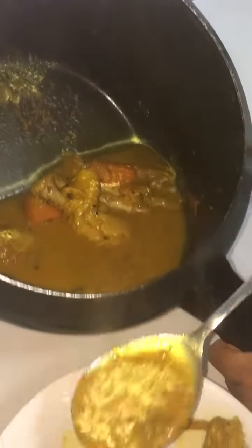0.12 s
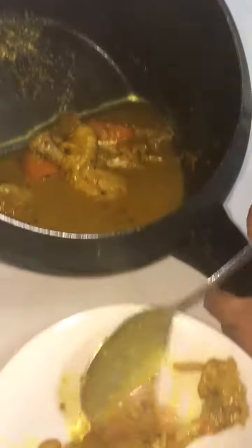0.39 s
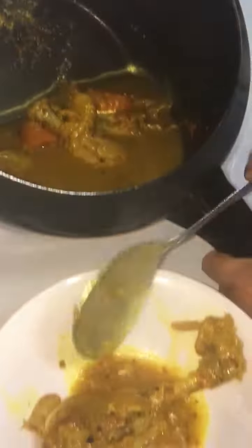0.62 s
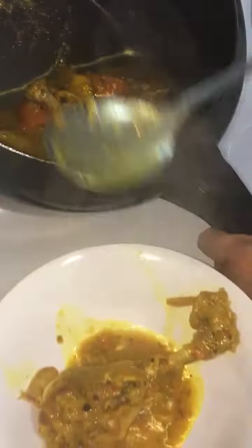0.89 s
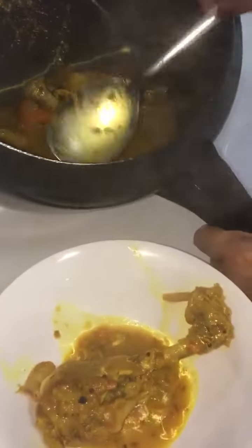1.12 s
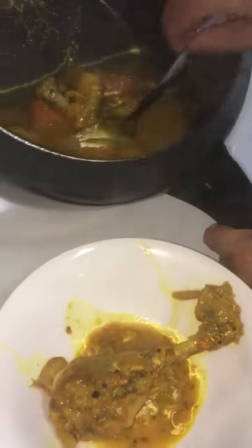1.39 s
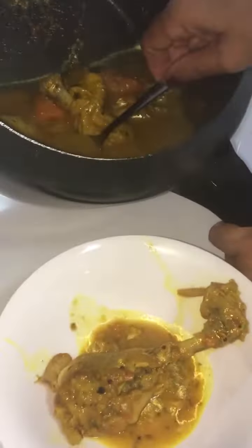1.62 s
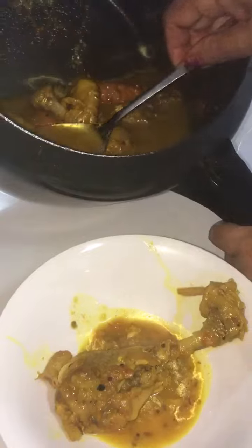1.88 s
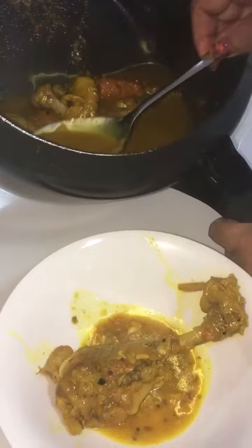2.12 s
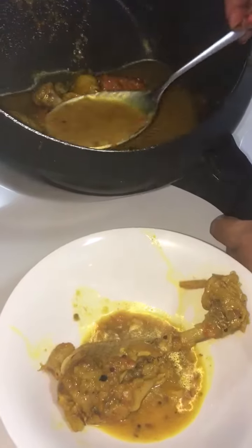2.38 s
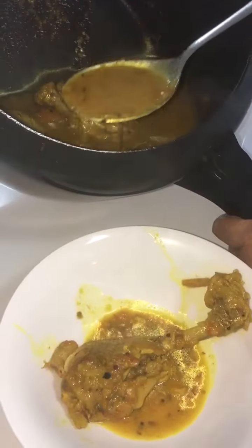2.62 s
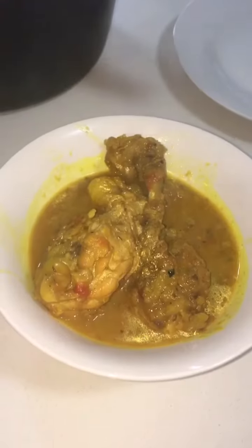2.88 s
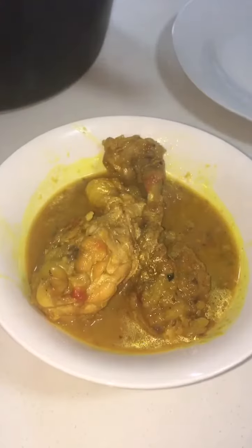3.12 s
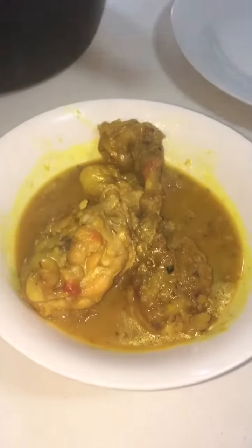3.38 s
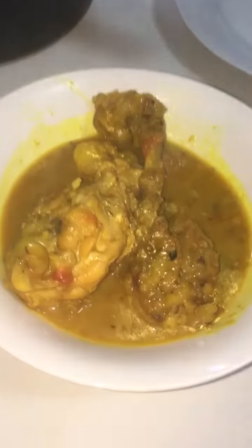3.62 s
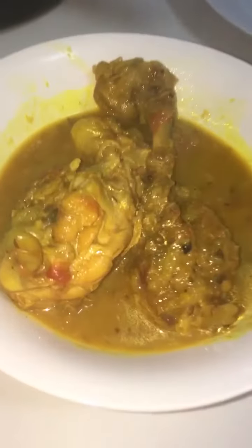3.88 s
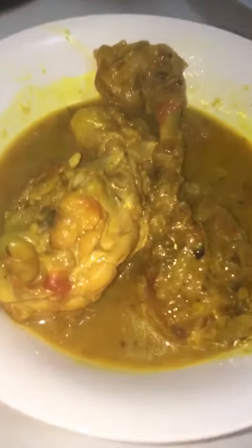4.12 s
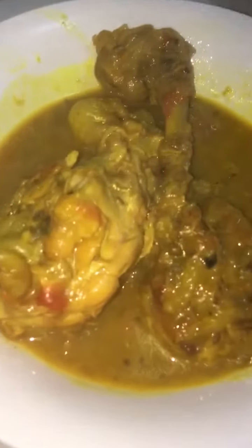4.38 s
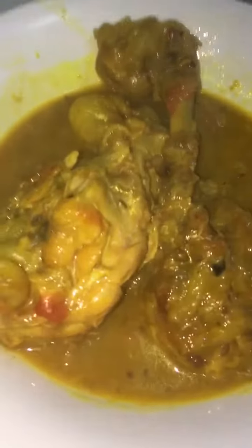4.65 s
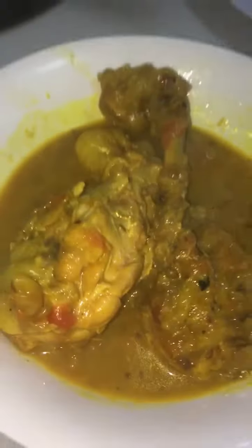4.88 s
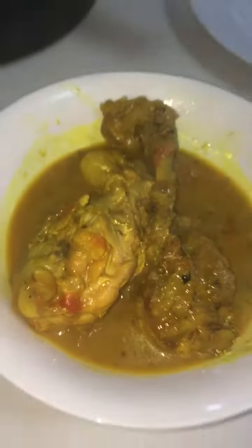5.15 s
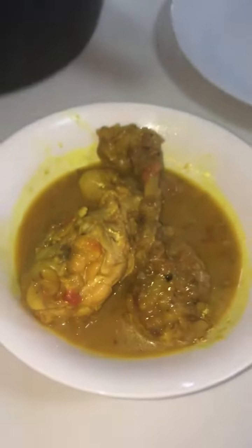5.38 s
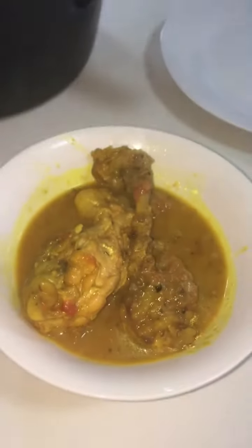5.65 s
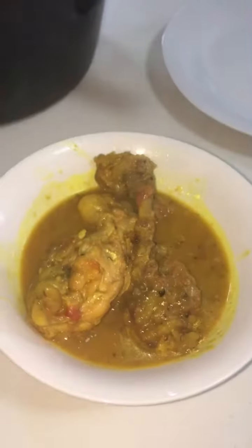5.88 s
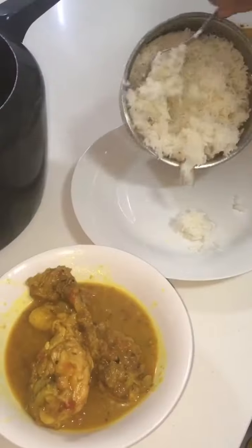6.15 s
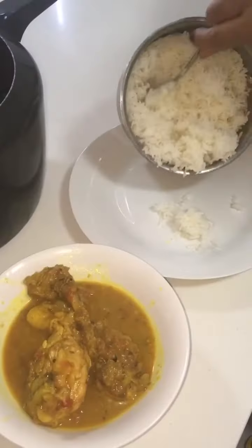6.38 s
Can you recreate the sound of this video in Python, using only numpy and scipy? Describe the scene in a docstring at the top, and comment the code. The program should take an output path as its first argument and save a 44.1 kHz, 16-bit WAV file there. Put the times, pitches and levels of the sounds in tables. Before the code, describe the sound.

A metal spoon knocks and scrapes inside a cooking pot in a humming kitchen, then cutlery clanks loudly, a dish drags and rice patters on a plate.

```python
"""A hard-walled home kitchen hums (filtered noise) under spells of rustling movement (shaped noise); a fan
squeaks once a turn (gliding tones), and drips and wet ticks snap and ring (noise bursts, damped sines).
A serving spoon strikes the inside of a cooking pot (modes set off by clicks), then scrapes it (stick-slip grains).
Knocks and bright clatters (noise bursts, wooden modes) and clanks of steel cutlery (modes, broad crash) lie further off.
Near the end a dish is dragged (boom and rasp), and rice patters on a plate (noise snaps, the louder grains ringing)."""
import sys
import numpy as np
from scipy import signal
from scipy.fft import rfft, irfft, next_fast_len
from scipy.io import wavfile
from scipy.ndimage import uniform_filter1d

SR = 44100
rng = np.random.default_rng(int(sys.argv[2]) if len(sys.argv) > 2 else 0)


def int16_out(signal):
    """Quantize to a 16-bit WAV file."""
    q = np.round(np.clip(np.atleast_2d(signal).T, -1, 1) * 32767)
    wavfile.write(sys.argv[1], SR, q.astype(np.int16))


def voltage_ratio(decibels):
    """Convert decibels (scalar or array-like) to amplitude ratios, 20 dB per decade."""
    exponent = np.asarray(decibels, float) / 20
    return 10 ** exponent


N = 287267

# modes of the pot with the spoon against it: f/Hz, free t60/s, relative level/dB struck, relative level/dB rubbed
POT_MODES = [(511, 0.3, -28.5, -24), (930, 0.39, -34, -15.5), (1018, 0.07, -12, -4.5),
             (1543, 0.17, -10, -12), (1920, 0.12, -25.5, -21), (2280, 0.091, -14.5, -55),
             (2449, .09, -14, -5), (2505, .095, 2.5, -3), (2527, .17, -3.5, -4), (2575, .06, -15, -1),
             (2580, 0.053, -36, -38), (2820, 0.27, -10.5, -11), (3064, 0.21, -19.5, -10.5),
             (3080, 0.096, -10.5, -26), (3450, 0.095, -6, -42), (3510, 0.045, -2.5, -11.5),
             (3610, 0.086, -20, -3), (3976, 0.079, -5.5, -3), (4060, 0.035, -13, -10),
             (4530, 0.0484, -6, -6), (4580, 0.051, -10, -48), (4980, 0.048, -39, -16),
             (5720, 0.089, -22, -11.5), (6390, 0.03, -47, -12.5), (6860, 0.041, -17.5, -18),
             (8450, .02, -31, -34), (8450, .02, -27, -21)]


def rms_one(x):
    """Normalisation: scale to unit rms."""
    return x / np.sqrt(np.mean(x ** 2) + 1e-20)


def level(rows, column):
    """Envelope: gain along straight lines in dB between the rows, silent outside them."""
    rows, out = np.array(rows), np.zeros(N)
    first, last = max(round(rows[0, 0] * SR), 0), min(round(rows[-1, 0] * SR), N)
    span = np.arange(first, last)
    out[span] = voltage_ratio(np.interp(span / SR, rows[:, 0], rows[:, column]))
    return out


def coloured(spectrum):
    """Spectral shaping: white noise weighted by a dB curve over log frequency, rms 1."""
    hz, db = np.transpose(spectrum)
    size = next_fast_len(N)
    log_hz = np.log(np.maximum(np.fft.rfftfreq(size, 1 / SR), 1))
    weight = voltage_ratio(np.interp(log_hz, np.log(hz), db))
    noise = irfft(rfft(rng.standard_normal(size)) * weight, size)
    return rms_one(noise[:N])


def band(x, low_hz, high_hz):
    """Band-pass filtering between two edges."""
    edges = [low_hz, min(high_hz, .45 * SR)]
    return signal.sosfilt(signal.butter(2, edges, "band", fs=SR, output="sos"), x)


def drift(rate):
    """Random modulation: normal values of spread 1, drawn rate times a second and joined by lines."""
    steps = rng.standard_normal(int(N * rate / SR) + 2)
    return np.interp(np.arange(N) * rate / SR, np.arange(len(steps)), steps)


def ring(x, hz, t60):
    """Damped resonator: a unit click sets off a decaying sine of height 1."""
    r, w = voltage_ratio(-60 / (max(t60, .001) * SR)), 2 * np.pi * hz / SR
    driven, out = np.flatnonzero(x), np.zeros(len(x))
    # computed from the first drive until the ring has died away
    part = slice(driven[0], driven[-1] + int(2 * t60 * SR))
    out[part] = signal.lfilter([0, np.sin(w)], [1, -2 * r * np.cos(w), r * r], x[part] + 1e-18)
    return out


def place(out, s, sound):
    """Superposition: a copy of out with a short sound added at time s."""
    i, out = round(s * SR), out.copy()
    out[i:i + len(sound)] += sound[:N - i]
    return out


def burst(t60, length=.05):
    """Exponential decay: white noise that dies away."""
    t = np.arange(round(length * SR)) / SR
    return rng.standard_normal(len(t)) * voltage_ratio(-60 * t / t60)


def room_tone():
    """Stationary noise: a coloured floor, and noise through narrow resonators that hums."""
    # spectrum of the floor: f/Hz, relative level per Hz/dB
    floor_spectrum = [(25, -27), (45, -7), (75, -13), (110, -4.5), (150, -5), (200, -4), (310, -13.5),
                      (600, -17.5), (1200, -20.5), (2600, -23), (4200, -34), (5000, -40), (6200, -35.5),
                      (7500, -46), (12000, -42.5), (16000, -45)]
    # hums: f/Hz, nominal width/Hz, rms level/dB
    hum_bands = [(97, 6.4, -58), (197.2, 21, -59), (778, 32, -69), (584.6, 8.7, -66.5), (1389, 17, -71)]
    tone = voltage_ratio(-50.5 + 2.4 * drift(5)) * coloured(floor_spectrum)
    hum = 0
    for hz, width_hz, db in hum_bands:
        hum = hum + voltage_ratio(db) * rms_one(ring(rng.standard_normal(N), hz, 3.04 / width_hz))
    return tone + hum


def rustle():
    """Noise under envelopes: rustling movement and two fading tails, each a bright hiss and a middle body."""
    # rustling movement, with the fading tails of the scrape (1.947 s) and of a clank (4.101 s):
    # start t/s, length/s, relative level/dB at start, relative level/dB at end, gain of the body/dB
    noise_rows = [(0, 1.7, -84, -83, 13), (1.947, .5, -75, -83.5, 9), (2.72, 0.98, -72.5, -73, 7),
                  (4.101, 0.29, -68.5, -82, 9.5), (4.702, .33, -69, -70, 6.5), (5.033, .3, -79, -69, 11.5),
                  (5.441, 0.55, -68.5, -69, 7.5), (5.529, 0.29, -63, -75, 9), (5.845, 0.22, -71.5, -73, 13),
                  (6.202, 0.33, -83, -67.5, 2.5)]
    # spectrum of the hiss: f/Hz, relative level per Hz/dB
    hiss_spectrum = [(2500, -25), (4000, 0.5), (5000, -1.5), (6500, 3), (8000, -3.5), (13000, 0),
                     (16000, -2.5)]
    # spectrum of the body: f/Hz, relative level per Hz/dB
    body_spectrum = [(400, -24.5), (700, -6.5), (1080, 0.5), (1450, -12), (2000, -6.5), (3200, -13.5),
                     (4500, -23.5)]
    fade_s = .04  # smooths both ends of a row
    bright = coloured(hiss_spectrum) * voltage_ratio(4.5 + 0.73 * drift(120))
    middle = coloured(body_spectrum) * voltage_ratio(2.8 * drift(30))
    out = np.zeros(N)
    for s, length, start_db, end_db, body_db in noise_rows:
        line = level([(s, start_db), (s + length, end_db)], column=1)
        envelope = uniform_filter1d(line, size=round(fade_s * SR))
        out += envelope * (bright + voltage_ratio(body_db) * middle)
    return out


def squeaks():
    """Frictional vibration of a fan bearing, once a turn: a rough tone scoops up and sags, with its octave."""
    first_s, turn_s, length_s, rise_s = .067, .8303, .11, .011
    pitch_hz, scoop_hz, scoop_s, sag_hz_per_s = 6830, 450, .018, 1000
    nominal_db, growth_db_per_s, fade_db_per_s, octave_db = -63, .5, 199.5, -5
    t, out = np.arange(round(length_s * SR)) / SR, np.zeros(N)
    hz = pitch_hz - scoop_hz * np.exp(-t / scoop_s) - sag_hz_per_s * t
    fade = voltage_ratio(nominal_db - fade_db_per_s * t) * np.sqrt(1 - t / length_s)
    shape = np.minimum(t / rise_s, 1) * fade
    for start in np.arange(first_s, N / SR, turn_s):
        phase = 2 * np.pi * np.cumsum(hz + 110 * drift(300)[:len(t)]) / SR
        tone = np.sin(phase) + voltage_ratio(octave_db) * np.sin(2 * phase)
        out = place(out, start, voltage_ratio(growth_db_per_s * start) * shape * tone)
    return out * voltage_ratio(9.0 * drift(230))  # roughness in level


def ticks():
    """Impulsive excitation: each drip, wet tick or louder rice grain is a bright snap and a short damped ring."""
    # drips, wet ticks, and at 6.27-6.44 s the louder rice grains:
    # t/s, gain of the snap/dB, ring f/Hz, ring peak level/dB, ring t60/s
    tick_rows = [(.2768, -30, 3960, -29.5, 0.0075), (.288, -46, 13400, -45, 0.035),
                 (.2885, -60, 10200, -50, .035), (.3545, -44, 13000, -55, .007),
                 (0.365, -32, 12000, -35.5, .008), (.391, -38, 2210, -41, .007),
                 (.4055, -34.5, 4270, -33.5, 0.0048), (0.407, -48, 5750, -46, 0.042),
                 (0.429, -50, 8700, -58, .015), (1.152, -58.5, 9300, -54, .01),
                 (1.189, -47.5, 5800, -51, .008), (1.2447, -44.5, 6000, -52, .008),
                 (1.254, -42.5, 12000, -54, 0.0088), (2.0863, -43, 10500, -43, .008),
                 (2.2667, -45, 5820, -40, 0.026), (2.2973, -39, 2950, -33, 0.028),
                 (2.302, -48.5, 3600, -38.5, 0.021), (2.698, -39.5, 6830, -41, 0.012),
                 (2.704, -56.5, 5600, -46, 0.021), (6.27, -45.5, 11970, -56.5, .008),
                 (6.341, -47, 15000, -61.5, .008), (6.375, -45.5, 7500, -48.5, 0.0084),
                 (6.4398, -36, 5470, -43, 0.013), (6.444, -41.5, 14000, -50, .012)]
    snap_edge, snap_share = .7, .55  # snap's lower edge over ring pitch; its decay over that of the ring
    out = np.zeros(N)
    for s, snap_db, hz, ring_db, t60 in tick_rows:
        snap = burst(snap_share * t60)
        for _ in range(2):  # twice, for steeper edges
            snap = band(snap, snap_edge * hz, 17000)
        ping = ring(burst(snap_share * t60), hz, t60)
        ping = ping / np.max(np.abs(ping))
        out = place(out, s, voltage_ratio(snap_db) * snap + voltage_ratio(ring_db) * ping)
    return out


def struck_pot():
    """Modal response to impact: rapid contacts set off the pot's modes, with a crack and a thump."""
    # rapid contacts of the spoon, the third strongest: t/s, relative level/dB
    contacts = [(1.3008, -24), (1.3018, -15), (1.3030, -13), (1.3046, -20)]
    s, db = np.transpose(contacts)
    clicks = np.zeros(N)
    clicks[np.round(s * SR).astype(int)] = voltage_ratio(db)
    struck = sum(voltage_ratio(mode_db) * ring(clicks, hz, t60) for hz, t60, mode_db, _ in POT_MODES)
    crack = place(np.zeros(N), s[0], voltage_ratio(-16) * band(burst(.02), 600, 7200))
    thump = place(np.zeros(N), s[1], voltage_ratio(-15.5) * band(burst(0.2, .15), 85, 238))
    return struck + crack + thump


def scraped_pot():
    """Stick-slip friction: random grains and jolts drive the pot's modes, damped by the spoon, under hiss."""
    # the spoon dragged over the pot: t/s, pressure level/dB, speed (0-1)
    strokes = [(1.328, -25, 0.2), (1.376, -36.5, 0.2), (1.41, -28.5, 0), (1.44, -40.5, 0.34),
               (1.549, -43, 0.1), (1.6, -36.5, .4), (1.625, -46, 0.45), (1.66, -51, 0.2),
               (1.684, -40.5, 0.47), (1.75, -33, 0), (1.8, -31, 0.13), (1.82, -36.5, 0.1),
               (1.832, -43.5, 0.4), (1.855, -31, 0.23), (1.9, -37.5, 0.86), (1.92, -39.5, 0.77),
               (1.94, -52, 0.8), (2.0, -67, 0.5)]
    # jolts of the spoon: t/s, relative level/dB, best excited f/Hz
    jolts = [(1.393, -37, 1003), (1.435, -44, 1000), (1.578, -43, 2590), (1.602, -43, 1500),
             (1.809, -39.5, 500), (1.888, -37, 502), (1.96, -54, 496)]
    # spectrum of the broad hiss: f/Hz, relative level per Hz/dB
    hiss_spectrum = [(180, -40), (300, -76), (511, -14), (2170, -24), (2570, -3.5), (3290, 3.5),
                     (4090, -10.5), (16000, -40)]
    grains_per_s, damping, jolt_reach = 1600, .55, .13  # mean rate; share of ring time left; octaves
    low_modes_db = -3  # under 1.3 kHz
    upper_modes_db, upper_speed_db = -5, 7  # over 3.3 kHz: gain at rest, and what full speed adds
    sizzle_db, sizzle_speed_db = -30.5, 24  # bright hiss likewise
    t = np.arange(N) / SR
    pressure = level(strokes, column=1)
    speed = np.interp(t, np.array(strokes)[:, 0], np.array(strokes)[:, 2])
    slips = rng.random(N) < grains_per_s / SR
    sizes = voltage_ratio(3.35 * np.minimum(rng.exponential(1, N), 4))
    grains = rms_one(slips * sizes * rng.choice([-1, 1], N))
    grains = grains * voltage_ratio(3.0 * drift(60)) * pressure
    s, jolt_db, best_hz = np.transpose(jolts)
    jolt_at = np.round(s * SR).astype(int)
    rubbed = np.zeros(N)
    for hz, t60, _, db in POT_MODES:
        touch = voltage_ratio(db + 2.8 * drift(25))  # the contact point wanders
        if hz < 1300:
            touch = touch * voltage_ratio(low_modes_db)
        elif hz > 3300:
            touch = touch * voltage_ratio(upper_modes_db + upper_speed_db * speed)
        # long rings would gather more energy from the grains
        drive = voltage_ratio(5.5) * grains * touch / np.sqrt(damping * t60 * SR)
        octaves_off = np.log2(hz / best_hz)
        drive[jolt_at] += voltage_ratio(jolt_db - 14 * (octaves_off / jolt_reach) ** 2)
        rubbed += ring(drive, hz, damping * t60)
    hiss = pressure * voltage_ratio(-8 + 3.5 * drift(80)) * coloured(hiss_spectrum)
    sizzle_gain = voltage_ratio(sizzle_db + sizzle_speed_db * speed + 1.3 * drift(150))
    sizzle = pressure * sizzle_gain * rms_one(band(rng.standard_normal(N), 3700, 13500))
    return rubbed + hiss + sizzle


def knocks():
    """Impact and resonance: a short band of noise, while the same band of the blow rings a wooden cupboard."""
    # knocks and bright clatters across the room: t/s, relative level/dB, lower edge f/Hz, upper edge f/Hz
    knock_rows = [(3.088, -39.5, 300, 3300), (3.092, -39, 79, 250), (3.285, -43.5, 2450, 14950),
                  (4.71, -54, 4070, 9980), (4.933, -45, 2000, 14000), (5.177, -56, 8000, 14930),
                  (5.214, -42, 2000, 15000), (5.218, -34.5, 450, 3230)]
    # modes of the cupboard: f/Hz, relative level/dB, t60/s
    cupboard_modes = [(260, -8, .025), (780, -4, .016), (1050, -5, .016), (1480, -1, .014),
                      (2250, -1, .012), (2800, -5, .01), (3300, -5, .012)]
    shortest_t60_s, extra_cycles, cupboard_db = .029, 13, 5  # deeper knocks last longer
    out, blows = np.zeros(N), np.zeros(N)
    click = np.arange(SR // 20) == 0
    for s, db, low_hz, high_hz in knock_rows:
        noise = burst(shortest_t60_s + extra_cycles / low_hz, .1)
        noise = noise * np.sqrt(SR / 2 / (high_hz - low_hz))  # makes up for the narrow band
        noise = band(band(noise, low_hz, high_hz), 0.15 * low_hz, 0.84 * high_hz)
        out = place(out, s - .001, voltage_ratio(db) * noise)
        blows = place(blows, s, voltage_ratio(db + cupboard_db) * band(click, low_hz, high_hz))
    return out + sum(voltage_ratio(db) * ring(blows, hz, t60) for hz, db, t60 in cupboard_modes)


def cutlery():
    """Selective modal excitation: each clank favours modes near its own pitch, over a broad crash."""
    # modes of the steel: f/Hz, relative level/dB, t60/s
    steel_modes = [(1515, -3, .15), (1700, -7, .1), (2268, -2.5, .24), (2810, -12, .2), (3030, -8, .15),
                   (3185, -6, .15), (3320, -7, .21), (3500, -12, .1), (4330, -12, .1), (4500, -16, .2),
                   (5408, 0, .32), (5680, -20, .12), (5940, -16, .1), (6535, -14, .2), (6680, -3, .25),
                   (7150, -9, .2), (7460, -15, .18), (7640, -16, .16), (8060, -4, .3), (8960, -15, .15),
                   (9480, -13, .15), (9570, -6, .25), (9920, -12, .2), (10210, -12, .2), (11150, -5, .25),
                   (11300, -8, .22), (12420, -4, .22), (12850, -9, .2), (13180, -8, .2), (13680, -3, .22),
                   (14600, -7, .18), (15200, -11, .15)]
    # clanks: t/s, relative level/dB, best excited f/Hz, reach/octaves, relative crash level/dB
    clanks = [(3.345, -47.5, 9700, 0.35, -67), (3.505, -56, 9000, 0.54, -75),
              (3.7448, -14, 6900, 1.94, -20), (3.7558, -11.5, 5500, 0.68, -22.5),
              (4.465, -38, 9040, 0.058, -66)]
    # spectrum of the crash: f/Hz, relative level per Hz/dB
    crash_spectrum = [(240, -64), (400, -34), (1560, -4.5), (2090, -7.5), (3120, -8), (4880, -14.5),
                      (5520, -10.5), (6240, -15), (9920, -11), (16000, -19.5)]
    twin_split, twin_db = .0025, -8  # each mode has a weaker twin this share higher
    crash_decays = [(0, .06), (-22, .5)]  # level/dB, t60/s: the crash, then the shimmer of many small modes
    s, peak_db, best_hz, reach, crash_db = np.transpose(clanks)
    at, out = np.round(s * SR).astype(int), np.zeros(N)
    for hz, db, t60 in steel_modes:
        clicks = np.zeros(N)
        octaves_off = np.log2(hz / best_hz)
        chance_db = 1.8 * rng.standard_normal(len(s))
        clicks[at] = voltage_ratio(peak_db + db - 12 - 4.7 * (octaves_off / reach) ** 2 + chance_db)
        out += ring(clicks, hz, t60) + voltage_ratio(twin_db) * ring(clicks, hz * (1 + twin_split), t60)
    loud, dying = np.zeros(N), np.zeros(N)
    loud[at] = voltage_ratio(crash_db)
    for db, t60 in crash_decays:
        dying += voltage_ratio(db) * signal.lfilter([1], [1, -voltage_ratio(-60 / (t60 * SR))], loud + 1e-18)
    return out + dying * coloured(crash_spectrum)


def drag():
    """Friction-driven resonance: a dish rasps on a table top that booms, the boom slower to build."""
    # spectrum of the rasp: f/Hz, relative level per Hz/dB
    rasp_spectrum = [(150, -28), (250, 3.5), (444, -20), (519, -3.5), (710, -16), (860, -13), (1400, -15.5),
                     (2050, -23), (2490, -7), (3400, -26.5), (4820, -26.5), (6700, -26.5), (11700, -35),
                     (12800, -34), (16000, -46)]
    start_s, end_s, onset_db, end_db = 5.99, 6.062, -25, -4  # breaks off short

    def swell(rise_s):
        """Envelope: a rise to full level, then a slight fall."""
        return level([(start_s, onset_db), (start_s + rise_s, 0), (end_s, end_db)], column=1)

    boom = ring(rng.standard_normal(N), 114, 0.24) + 0.45 * ring(rng.standard_normal(N), 198, 0.065)
    rasp = voltage_ratio(2.2 * drift(150)) * coloured(rasp_spectrum)
    return voltage_ratio(-30) * swell(.033) * rms_one(boom) + voltage_ratio(-35.5) * swell(.012) * rasp


def rice():
    """Random point process: the softer grains patter on a plate, each a bright snap without a ring."""
    start_s, end_s, grains_per_s, typical_db = 6.19, 7.7, 45., -52.5  # mean rate; level of the landing
    t = np.arange(N) / SR
    lands = (rng.random(N) < grains_per_s / SR) * (t > start_s) * (t < end_s)
    lands = lands * voltage_ratio(typical_db + 3.7 * rng.standard_normal(N))
    return signal.fftconvolve(lands, band(burst(.005), 8000, 17000))[:N]


def kitchen(x):
    """Diffuse reverberation: hard walls return a dense decaying echo, its treble dying sooner."""
    t = np.arange(SR // 2) / SR
    rise = np.clip(t / 0.006, 0, 1)
    low = band(burst(.69, .5), 200, 6800)
    high = band(burst(.48, .5), 7500, 26000)
    tail = rise * (low + high)
    return signal.fftconvolve(x, tail / np.sqrt(np.sum(tail ** 2)))[:N]


def scene():
    """Direct-to-reverberant ratio: near things are nearly dry, far ones have more echo."""
    squeak, tick = squeaks(), ticks() + rice()
    struck, rubbed = struck_pot(), scraped_pot()
    knock, clank = knocks(), cutlery()
    direct = struck + rubbed + clank + tick + knock + squeak
    near = voltage_ratio(-21) * (struck + tick)
    far = voltage_ratio(-16.5) * rubbed + voltage_ratio(-6.5) * clank + voltage_ratio(-3.5) * knock + voltage_ratio(2.5) * squeak
    mix = direct + kitchen(near + far) + drag() + room_tone() + rustle()
    return mix[None]


def band_limit(x):
    """A steep low-pass at the top of the band."""
    return signal.sosfilt(signal.butter(12, 16870, fs=SR, output="sos"), x)


def record(dry):
    """Microphone response: soft saturation of the loudest peaks, a treble dip and band limits."""
    dip_hz, dip_width_hz, dip_depth = 10500, 1100, .33
    heard = dry / (1 + np.abs(dry / .95) ** 6) ** (1 / 6)
    dip = signal.lfilter(*signal.iirpeak(dip_hz, dip_hz / dip_width_hz, SR), heard)
    heard = heard - dip_depth * dip
    heard = signal.sosfilt(signal.butter(3, 40, "high", fs=SR, output="sos"), heard)
    finished = signal.sosfilt(signal.cheby2(16, 30, 16000, fs=SR, output="sos"), heard)
    return band_limit(finished)


dry = scene()
out = record(dry)
int16_out(out)
```